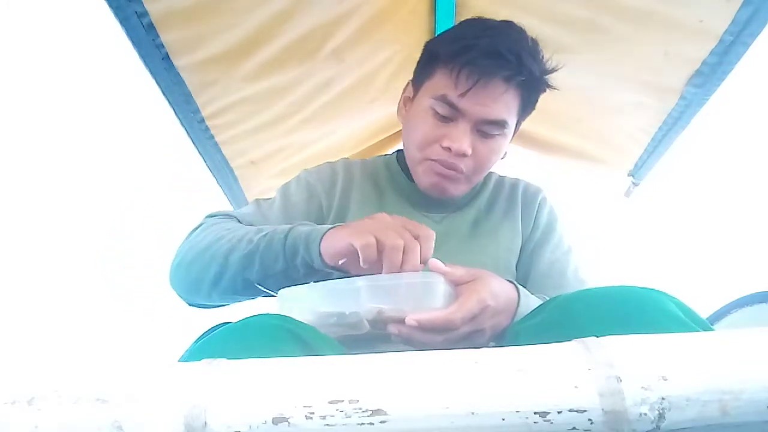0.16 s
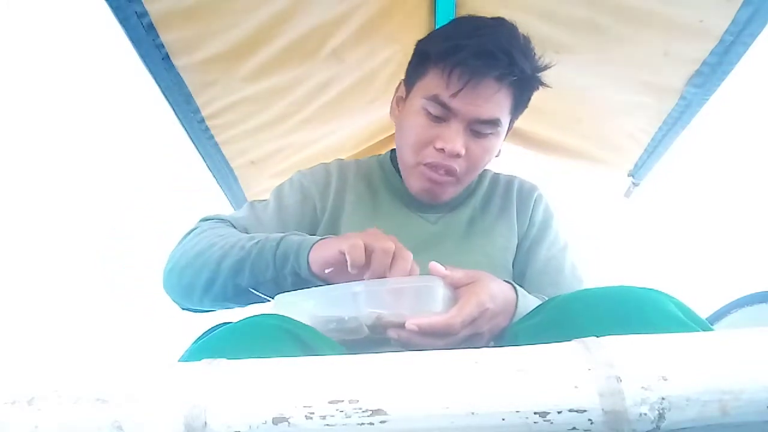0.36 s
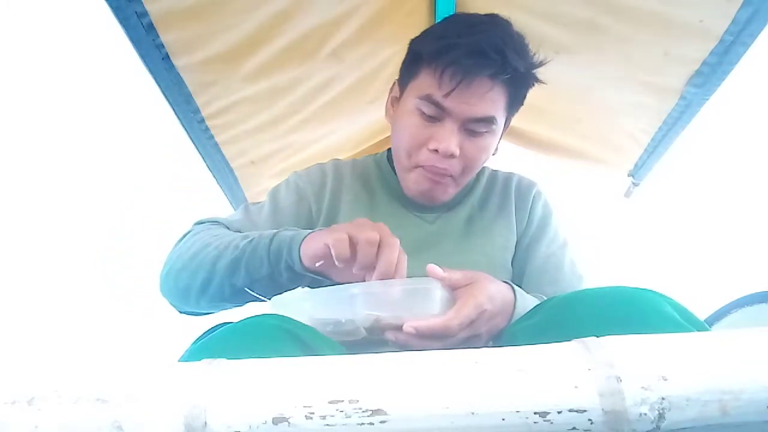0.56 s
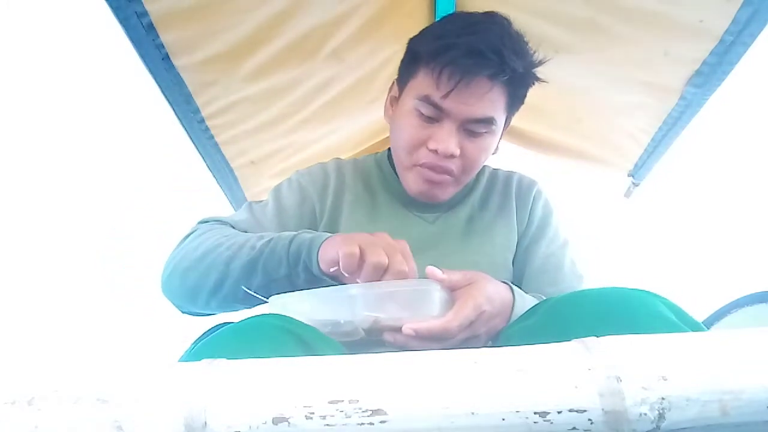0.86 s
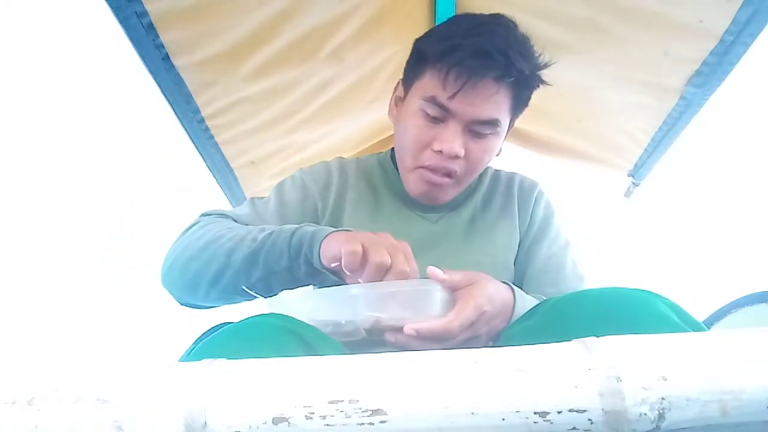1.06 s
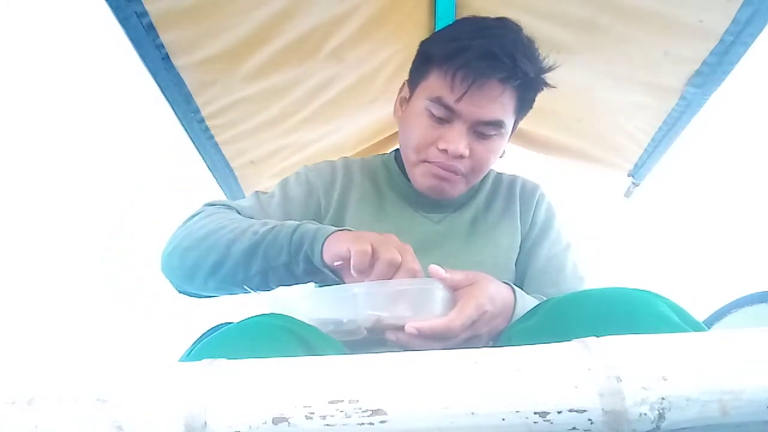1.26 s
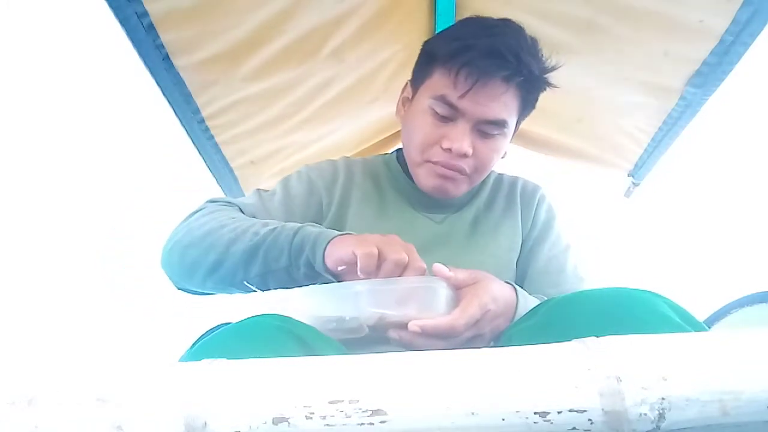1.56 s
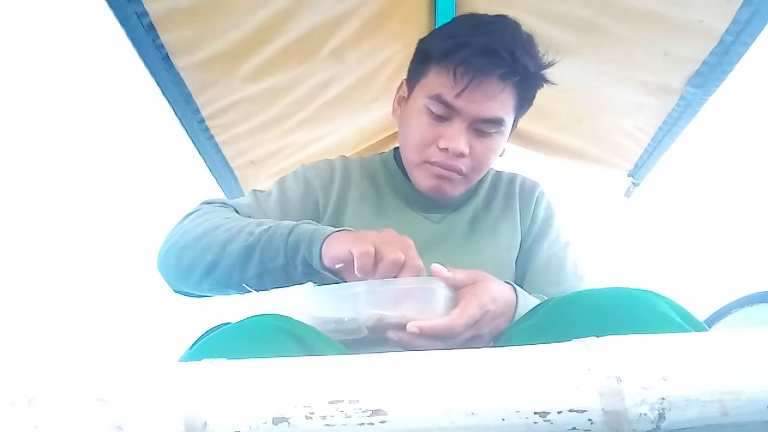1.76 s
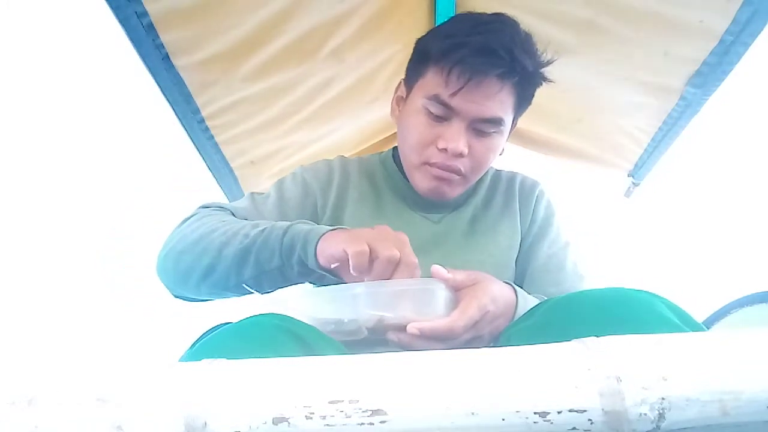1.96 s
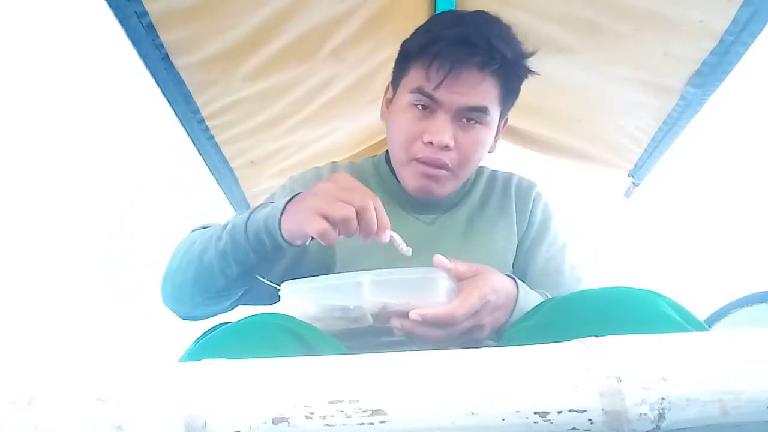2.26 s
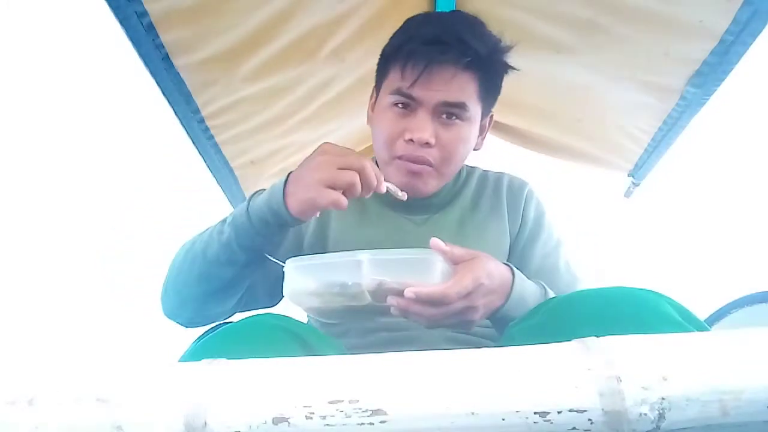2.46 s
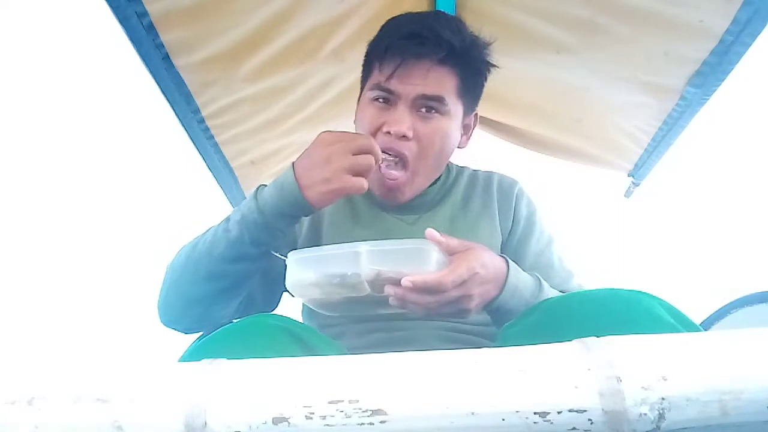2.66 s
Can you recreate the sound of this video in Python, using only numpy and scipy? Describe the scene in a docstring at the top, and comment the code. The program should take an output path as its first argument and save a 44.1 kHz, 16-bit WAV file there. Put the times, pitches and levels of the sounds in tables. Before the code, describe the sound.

Water lapping against a small boat's hull, with light splashes, drips, sharp spatters and soft low thumps

```python
"""Soft thumps of water against a small boat, its hull droning on one low note, heard from under an awning.
The thumps are short low tones with a noisy rumble around them; the drone is one wavering sine.
Fizz, trickle, slaps and swishes are crowds of ringing bubbles; sharp spatters are clusters of tiny rings.
Drips are single ringing tones. A faint sea wash of shaped noise lies beneath.
Short, dense echoes surround the water; the sound is almost mono."""
import sys
import numpy as np
from scipy import signal
from scipy.fft import rfft, irfft
from scipy.io import wavfile
from scipy.ndimage import uniform_filter1d

SR = 44100
rng = np.random.default_rng(int(sys.argv[2]) if len(sys.argv) > 2 else 0)


def generate_wav(signal):
    """Clip the signal to [-1, 1] and save it as 16-bit WAV at the path in sys.argv[1]."""
    frames = np.transpose(np.atleast_2d(signal))
    scaled = np.clip(frames, -1, 1) * 32767
    pcm = np.round(scaled).astype(np.int16)
    wavfile.write(sys.argv[1], SR, pcm)


N = 123479
T = np.arange(N) / SR  # seconds
CUTOFF_HZ = 15800  # top of the whole sound
WASH_DB = -64.5
# Tone colour of the sea wash, shared by the steady side noise.
# Each row: frequency in Hz, relative level in dB.
WASH_COLOUR = [(20, -49), (60, 13), (130, 11.5), (293, -2), (759, -4.5), (1120, -11), (1660, -15.5),
               (2400, -14.5), (4420, -30.5), (8410, -15.5), (15000, -39)]


def from_db(db):
    """Decibels to gain."""
    return 10 ** (np.asarray(db) / 20)


def rms_one(x):
    """Scale to unit power."""
    return x / np.sqrt(np.mean(x ** 2) + 1e-20)


def level(curve):
    """Gain along a curve of (seconds, dB) points."""
    return from_db(np.interp(T, *np.transpose(curve)))


def drift(rate):
    """Random wander with a spread near 1, through `rate` new values a second."""
    return np.interp(T * rate, np.arange(1000), rng.standard_normal(1000))


def swell(s, db, attack, decay):
    """Gain of one rise and exponential decay, starting at s seconds."""
    rise = np.clip((T - s) / attack, 0, 1) ** 2
    fall = np.exp(-np.maximum(T - s - attack, 0) / decay)
    return from_db(db) * rise * fall


def colour(x, points):
    """Shape by (Hz, dB) points, falling 120 dB per octave outside them; unit power."""
    hz, db = np.transpose(points)
    octave = np.log2(np.maximum(np.fft.rfftfreq(N, 1 / SR), 1))
    outside = np.abs(octave - np.clip(octave, np.log2(hz[0]), np.log2(hz[-1])))
    gain = from_db(np.interp(octave, np.log2(hz), db) - 120 * outside)
    return rms_one(irfft(rfft(x) * gain, N))


def band(x, low, high, order=2):
    """Causal band-pass."""
    sos = signal.butter(order, [low, min(high, .45 * SR)], "band", fs=SR, output="sos")
    return signal.sosfilt(sos, x)


def add(out, s, sound):
    """Mix a sound in at its time, trimmed to the scene."""
    i = int(s * SR)
    sound, i = sound[max(-i, 0):], max(i, 0)
    out[i:i + len(sound)] += sound[:max(N - i, 0)]


def clumps(x, low_hz, high_hz, count=24):
    """Each register of the sound rises and falls on its own; unit power."""
    clump_db, clumps_per_s = 3.6, 24
    f = np.log(np.maximum(np.fft.rfftfreq(N, 1 / SR), 1))
    spectrum = rfft(x)
    centres = np.log(np.geomspace(low_hz, high_hz, count))
    out = 0
    for share in np.eye(count):  # overlapping triangular bands
        register = irfft(spectrum * np.interp(f, centres, share), N)
        out = out + register * from_db(clump_db * drift(clumps_per_s))
    return rms_one(out)


def grains(per_s, spread_db, cycles, low_hz, high_hz, count=36):
    """Random little bubbles of uneven size, each ringing one of many resonators; evened in level."""
    born = rng.random(N) < per_s / SR
    sizes = from_db(spread_db * np.minimum(rng.exponential(1, N), 4))
    kicks = sizes * rng.choice([-1, 1], N) * born
    dealt = rng.integers(0, count, N)
    out = 0
    for k, hz in enumerate(np.geomspace(low_hz, high_hz, count)):
        r = np.exp(-np.log(1000) * hz / cycles / SR)  # rings down 60 dB in `cycles` cycles
        w = 2 * np.pi * hz / SR
        ring = [np.sin(w), -np.sin(w)], [1, -2 * r * np.cos(w), r * r]
        out = out + signal.lfilter(*ring, kicks * (dealt == k) + 1e-18)
    return out / np.sqrt(uniform_filter1d(out ** 2, size=5000) + 1e-12)


def hollow(x):
    """Bubbles under the hull blur into a ringing murmur that is already under way at the start."""
    tail = rng.standard_normal(N) * np.exp(-np.log(1000) * T / .18)  # 60 dB down in .18 s
    return irfft(rfft(x) * rfft(tail), N)  # circular: the end rings on into the start


def thumps():
    """Each push of water is a low sine that swells to a crest and dies away symmetrically."""
    # Water against the hull. Each row: crest in seconds, level in dB, pitch in Hz, half-length in seconds.
    pushes_of_water = [(.010, -43.5, 141.4, 0.029), (0.389, -37.5, 78.6, 0.043), (.572, -33, 88.6, 0.016),
                       (.629, -37.5, 147, 0.017), (1.839, -44.5, 75.6, 0.017), (1.88, -39.5, 117, 0.027),
                       (1.919, -25.5, 108, 0.01), (1.950, -38.5, 138, 0.007), (1.962, -42.5, 68.6, 0.048),
                       (2.081, -27.5, 98, 0.013), (2.294, -51.5, 105, 0.061), (2.434, -42, 123, 0.01),
                       (2.487, -26.5, 113, 0.015)]
    out = np.zeros(N)
    for s, db, hz, half in pushes_of_water:
        shape = 1 / np.cosh(np.clip(2.82 * (T - s) / half, -40, 40))
        out += from_db(db) * shape * np.sin(2 * np.pi * hz * (T - s))
    return out


def shudder(pushes):
    """The hull rumbles loosely around each push: low noise follows the smoothed power of the thumps."""
    shudder_db, smoothing_s = -5.5, 0.046
    # Tone colour of the rumble. Each row: frequency in Hz, relative level in dB.
    rumble_colour = [(25, -34), (60, 14.5), (150, 15.5), (220, -7), (350, -24)]
    size = max(int(smoothing_s * SR), 1)
    power = uniform_filter1d(uniform_filter1d(pushes ** 2, size), size)
    rumble = colour(rng.standard_normal(N), rumble_colour)
    return from_db(shudder_db) * np.sqrt(np.abs(power)) * rumble


def drone():
    """The hull hums on one sine, wavering in pitch and level."""
    pitch_hz, wander, flutter_db = 141, .03, 1.2  # wander as a share of the pitch
    # Loudness of the hum. Each row: time in seconds, level in dB.
    hum_level = [(0, -64), (.74, -77.5), (.83, -44), (.93, -67.5), (1.01, -41.5), (1.11, -66),
                 (1.19, -52.5), (1.27, -41.5), (1.34, -68.5), (1.40, -42.5), (1.49, -66), (2.8, -67)]
    hz = pitch_hz * (1 + wander * drift(31.72))
    phase = 2 * np.pi * np.cumsum(hz) / SR
    return level(hum_level) * from_db(flutter_db * drift(34.13)) * np.sin(phase)


def wash():
    """The sea murmurs unevenly: shaped noise whose registers wander in level."""
    murmur = colour(rng.standard_normal(N), WASH_COLOUR)
    return from_db(WASH_DB) * clumps(murmur, 83, CUTOFF_HZ, count=10)


def froth():
    """Fine fizz above a trickle of small bubbles, both ringing under the hull."""
    # Loudness of the fizz within the froth. Each row: time in seconds, relative level in dB.
    fizz_level = [(0, -55), (.06, -67.5), (.22, -64), (.27, -50.5), (.37, -62), (.49, -68.5), (.59, -49.5),
                  (.66, -50.5), (.80, -54.5), (1.10, -55.5), (1.20, -52.5), (1.37, -51.5), (1.48, -64.5),
                  (1.62, -67.5), (1.66, -45.5), (1.82, -57), (1.89, -56.5), (2.04, -60), (2.07, -59),
                  (2.21, -52.5), (2.38, -51.5), (2.53, -50.5), (2.63, -61.5), (2.73, -60), (2.8, -55.5)]
    # Tone colour of the fizz. Each row: frequency in Hz, relative level in dB.
    fizz_colour = [(3500, -15.5), (5200, -4), (6800, 7), (8500, 3), (10400, 4.5), (12000, -5.5),
                   (15500, -9.5)]
    # Loudness of the trickle within the froth. Each row: time in seconds, relative level in dB.
    trickle_level = [(0, -69), (.14, -70), (.27, -56), (.46, -73.5), (.57, -49.5), (.70, -60.5),
                     (.88, -57.5), (1.09, -69), (1.18, -59.5), (1.44, -72.5), (1.61, -79), (1.67, -53.5),
                     (1.84, -70.5), (2.04, -71.5), (2.09, -64), (2.23, -62.5), (2.36, -63.5), (2.47, -59.5),
                     (2.57, -52.5), (2.68, -58), (2.8, -59.5)]
    # Tone colour of the trickle. Each row: frequency in Hz, relative level in dB.
    trickle_colour = [(1000, 0), (1350, 11.5), (1650, 22), (2100, 9.5), (3000, 12), (3800, -6.5),
                      (5000, -30)]
    pops = grains(2300, 4.5, 110, 3485, CUTOFF_HZ, count=60)
    fizz = colour(pops + rms_one(hollow(pops)), fizz_colour)
    fizz = clumps(fizz, 3490, CUTOFF_HZ, count=14)
    bubbles = hollow(grains(500, 4.5, 50, 1027, 4154))
    trickle = clumps(colour(bubbles, trickle_colour), 1070, 4150, count=12)
    return level(fizz_level) * fizz + level(trickle_level) * trickle


def droplets(t, spread, low_hz, high_hz, count=30):
    """A cluster of tiny ringing droplets scattered around time zero; unit energy."""
    lead, typical_cycles = 0.4, 34  # early scatter relative to late; median cycles to ring down 60 dB
    step = (np.arange(count)[:, None] + rng.random((count, 1))) / count
    hz = low_hz * (high_hz / low_hz) ** step
    start = spread / 2 * (rng.exponential(1, (count, 1)) - lead * rng.exponential(1, (count, 1)))
    age = np.maximum(t - start, 0) * hz  # in cycles
    cycles = typical_cycles * np.exp(rng.standard_normal((count, 1)))
    shape = (1 - np.exp(-age / 2)) * np.exp(-np.log(1000) * age / cycles)
    rings = shape * np.sin(2 * np.pi * age)
    sound = np.sum(rings / np.cbrt(cycles), axis=0)  # long rings are softer
    return sound / np.sqrt(np.sum(sound ** 2) + 1e-20)


def spatters():
    """Each spatter is a cluster of ringing droplets with a finer spray in the treble."""
    span, treble_hz, treble_top_hz = 1.794, 8180, 11360  # span: top over lowest pitch
    # Sharp spatters. Each row: time in seconds, level of the body in dB, lowest pitch in Hz,
    # treble relative to the body in dB, scatter of the droplets in seconds.
    bursts = [(.001, -45.5, 3080, 5, 0.0026), (0.243, -34.5, 5630, -24, 0.0048),
              (0.253, -34, 4580, -19, 0.0027), (0.306, -44, 4640, -13, 0.014),
              (0.514, -44.5, 2700, -9.5, 0.006), (0.5305, -38.5, 4420, -3, 0.0033),
              (0.57, -39, 5140, -4, 0.0053), (0.58, -49, 4220, 5, 0.0092),
              (0.612, -45.5, 3830, -10, 0.0063), (0.771, -40.5, 3417, -4, 0.003),
              (0.8339, -19.5, 5220, -29, 0.0018), (0.841, -35, 5100, -4, 0.0018),
              (0.848, -29.5, 4710, -9.5, 0.0039), (0.9149, -46, 4640, -6, 0.017),
              (0.9541, -35, 4015, -14.5, 0.0027), (0.958, -35, 3540, -9, 0.0025),
              (0.9995, -37.5, 5460, -36, 0.0055), (1.04, -44.5, 5000, -35, 0.0025),
              (1.056, -41, 4620, -8, 0.0041), (1.168, -46.5, 3100, -2.5, 0.011),
              (1.821, -45.5, 4600, -7, 0.0077), (1.429, -46, 6950, 4, 0.0039), (1.638, -40, 3585, 2, 0.004),
              (1.654, -40, 4920, -17, 0.0033), (1.673, -30.5, 4490, -16, 0.0041),
              (1.795, -46, 3580, -33, 0.0093), (2.05, -45, 6170, -13, 0.0045),
              (2.17, -41, 5200, -5, 0.0013), (2.2581, -34, 3820, -3.5, 0.001),
              (2.4203, -32, 5040, -6.5, 0.00085), (2.491, -47, 2880, -5, 0.0066),
              (2.545, -36, 5810, -5.5, 0.004)]
    out = np.zeros(N)
    t = T[:2600] - .012  # room for droplets that come early
    for s, db, hz, treble_db, spread in bursts:
        body = band(droplets(t, spread, hz, hz * span), 0.59 * hz, treble_top_hz, order=3)
        spray = droplets(t, spread, treble_hz, treble_top_hz, count=10)
        spray = spray + from_db(-8.0) * droplets(t, spread, treble_top_hz, CUTOFF_HZ, count=10)
        gain = from_db(db) * np.sqrt(abs(spread) * SR)  # a wider scatter carries more energy
        add(out, s + t[0], gain * (body + from_db(treble_db) * spray))
    return out


def drips():
    """Each bubble rings briefly, roughened by narrow noise, and rises a little in pitch."""
    t60_s, attack_s = 0.085, 0.005  # ring time at 1 kHz, shorter for higher pitches
    rise_per_s, roughness = 0.03, 0.55  # pitch rise as a share per second; noise gain
    # Drips and bubbles. Each row: start in seconds, relative level in dB, pitch in Hz.
    bubble_rings = [(.005, -50, 1657), (.09, -53.5, 1516), (.18, -57, 840), (.185, -56.5, 1368),
                    (.212, -49, 1900), (.246, -47.5, 1988), (0.318, -52.5, 1560), (0.393, -47.5, 1660),
                    (.398, -50.5, 2193), (0.529, -45.5, 1677), (.556, -47, 2920), (0.579, -46, 1335),
                    (0.642, -46, 2050), (0.847, -50.5, 1670), (.851, -48, 2335), (0.934, -45.5, 1283),
                    (1.135, -54.5, 1556), (1.496, -56, 2677), (1.567, -53, 229), (1.638, -45, 1583),
                    (1.675, -51.5, 686), (1.728, -49, 2468), (1.747, -54, 2172), (1.764, -35.5, 9130),
                    (0.475, -46.5, 9800), (1.779, -48.5, 2360), (1.814, -52.5, 1333), (1.95, -56, 3180),
                    (2.066, -52, 2500), (2.353, -48, 1610), (2.569, -44.5, 1239), (2.59, -49, 878),
                    (2.643, -58, 480), (2.785, -50, 2900)]
    out, t = np.zeros(N), T[:6000]
    for s, db, hz in bubble_rings:
        decay = np.exp(-np.log(1000) * t * np.sqrt(hz / 1000) / t60_s)
        shape = (1 - np.exp(-t / attack_s)) * decay
        tone = np.sin(2 * np.pi * hz * t * (1 + rise_per_s * t / 2))
        wobble = rms_one(band(rng.standard_normal(len(t)), hz / 1.025, hz * 1.105))
        add(out, s, 2.1 * from_db(db) * shape * (tone + roughness * wobble))
    return out


def swishes():
    """A sheet of water breaks into crackling droplets, in uneven surges."""
    surge_db, surges_per_s = 2, 110
    # Water along the side. Each row: start in seconds, level in dB, attack in seconds,
    # decay in seconds, lowest frequency in Hz, highest frequency in Hz.
    sheets = [(.51, -53.5, 0.011, 0.054, 1900, 5470), (2.046, -46.5, 0.0049, 0.04, 3160, 9100),
              (2.134, -43, 0.0071, 0.018, 2400, 9800), (2.261, -47, 0.03, 0.13, 2780, 6860),
              (2.32, -44.5, 0.036, 0.039, 2540, 10900), (2.345, -52.5, 0.0087, 0.062, 1390, 2590)]
    drops = grains(4000, 3.5, 45, 1300, 11500)
    surges = from_db(surge_db * drift(surges_per_s))
    out = np.zeros(N)
    for *envelope, low, high in sheets:
        crackle = band(np.roll(drops, rng.integers(N)), low, high, order=4)
        out += swell(*envelope) * rms_one(crackle)
    return surges * out


def slaps():
    """A wave sets off a crowd of large, hollow bubbles that swells and drains away."""
    # Waves on the side. Each row: start in seconds, level in dB, attack in seconds, decay in seconds.
    wave_hits = [(.55, -60, 0.038, 0.036), (1.134, -57.5, 0.029, 0.067), (1.656, -44.5, 0.011, 0.035),
                 (2.554, -52, 0.019, 0.08)]
    # Tone colour of the slaps. Each row: frequency in Hz, relative level in dB.
    slap_colour = [(250, -31), (340, -6.5), (400, -0.5), (500, 7), (620, 6), (700, 3), (820, 5), (930, 4.5),
                   (1120, -3.5), (1250, -3.5), (1420, -15), (1620, 0), (2400, -49)]
    bubbles = colour(hollow(grains(1200, 2, 14, 300, 2480)), slap_colour)
    return sum(swell(*row) for row in wave_hits) * bubbles


def awning(x):
    """A dense scatter of echoes: decaying noise after a short gap, of unit energy."""
    t60_s, gap_s = 0.14, 0.0014
    tail = rng.standard_normal(N) * np.exp(-np.log(1000) * T / t60_s)
    tail = tail * np.clip(T / gap_s - 1, 0, 1)
    return signal.fftconvolve(x, tail / np.sqrt(np.sum(tail ** 2)))[:N]


def scene():
    """Water and hull in the middle, with a trace of width from echoes and a faint steady noise."""
    echo_db, side_echo_db, side_noise_db = -5, -17.5, -20.5  # side noise is relative to WASH_DB
    pushes = thumps()
    water = from_db(-5) * froth() + spatters() + drips() + swishes() + slaps()
    hull = pushes + shudder(pushes) + drone()
    mid = hull + wash() + water + from_db(echo_db) * awning(water)
    # the width of the echoes fades in the treble
    side_echo = from_db(side_echo_db) * band(awning(water), 100, 4000, order=1)
    side_noise = from_db(side_noise_db + WASH_DB) * colour(rng.standard_normal(N), WASH_COLOUR)
    side = side_echo + side_noise
    return np.array([mid + side, mid - side])


def record(dry):
    """A steep low-pass cuts off the top."""
    sos = signal.ellip(10, .2, 70, CUTOFF_HZ, fs=SR, output="sos")
    return signal.sosfilt(sos, dry)


dry = scene()
out = record(dry)
generate_wav(out)
```